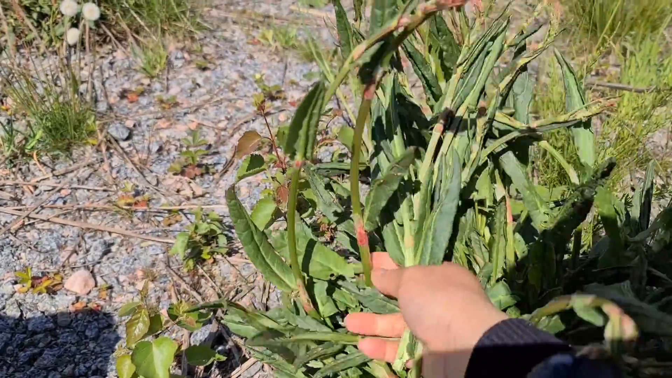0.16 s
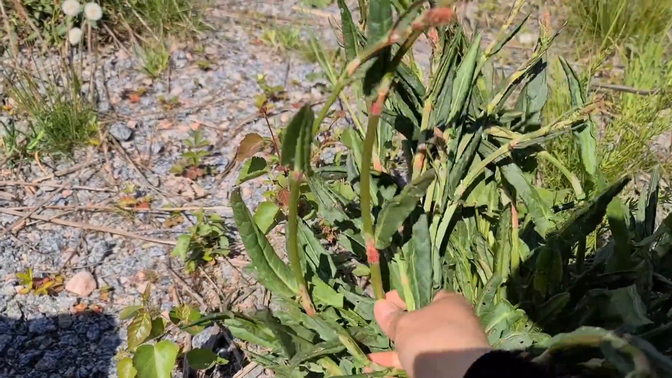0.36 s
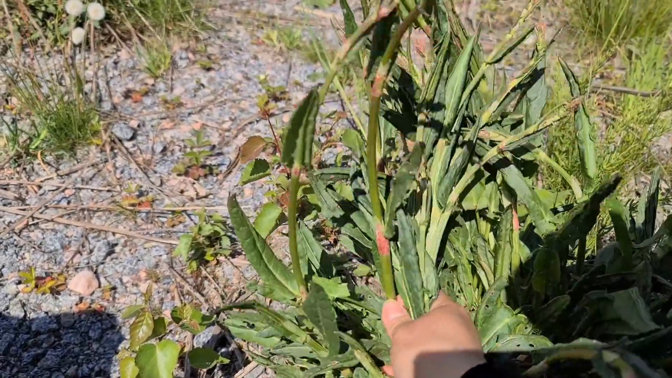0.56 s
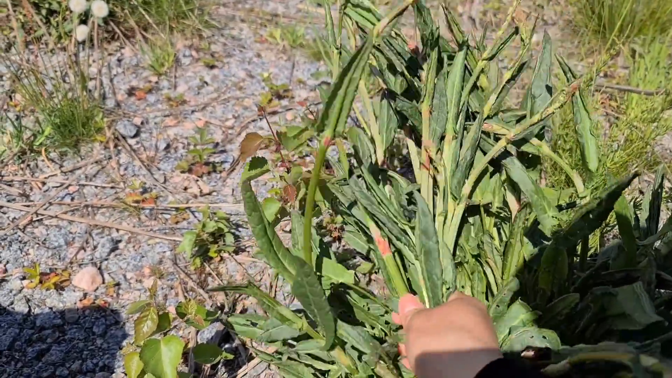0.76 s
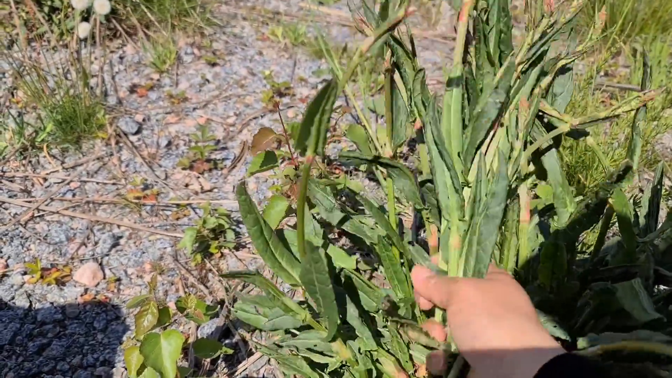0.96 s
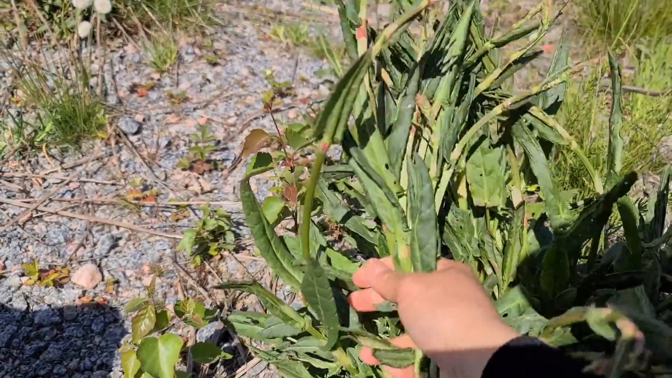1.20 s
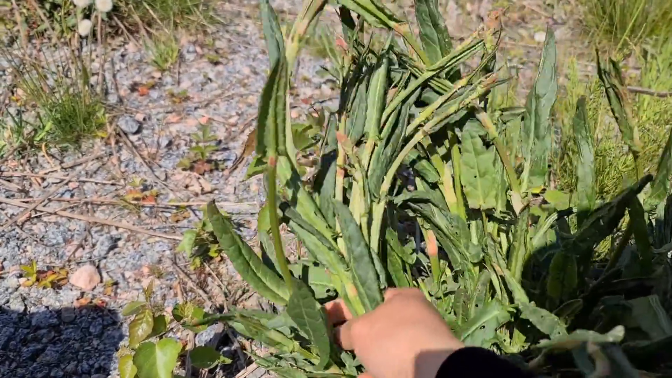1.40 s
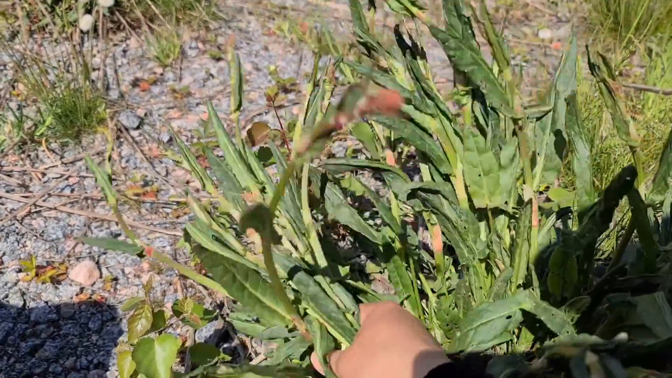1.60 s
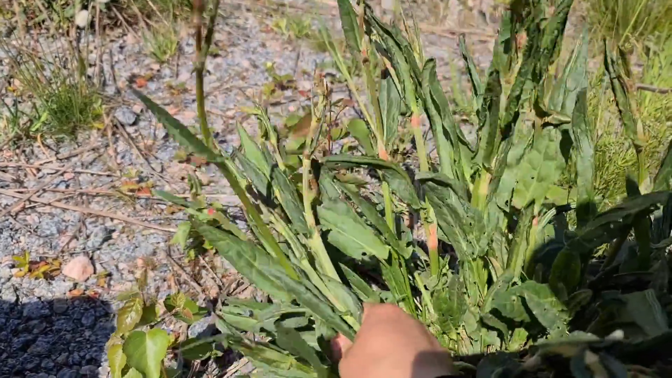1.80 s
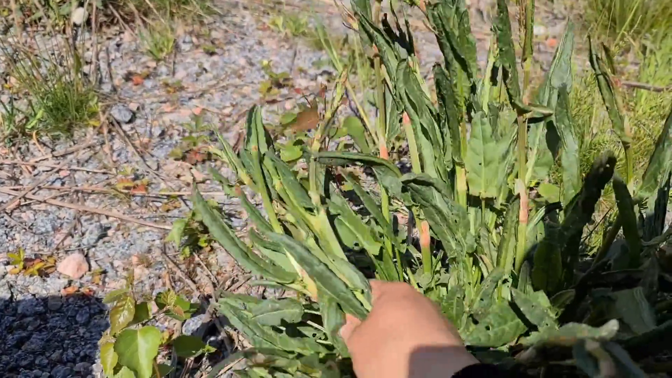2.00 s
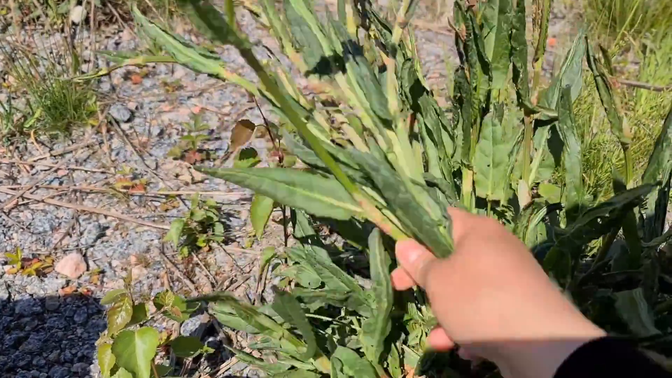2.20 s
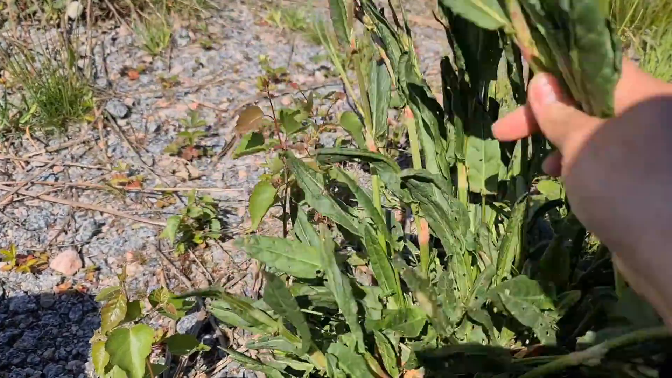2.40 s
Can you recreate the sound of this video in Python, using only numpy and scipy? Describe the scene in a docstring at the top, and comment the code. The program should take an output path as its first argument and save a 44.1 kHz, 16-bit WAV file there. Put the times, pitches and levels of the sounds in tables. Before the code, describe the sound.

Fleshy green stems snap in a hand very close to a stereo microphone: one loud hollow pop, a sharp crack, a softer pop, then a quick cluster and another crack, over low outdoor rumble.

```python
"""A hand picks a bunch of leafy stems in a garden, close to a stereo microphone.
Juicy stems give way with hollow pops, made of three decaying modes and a soil echo.
Fibres tear with sharp cracks, made of noise bursts with a jolt; leaves slide in dense streams of ticks.
Behind lie a low outdoor rumble of coloured noise and a small bird repeating a falling, swept-sine chirp."""
import sys
import numpy as np
from scipy import signal
from scipy.fft import rfft, irfft, next_fast_len
from scipy.io import wavfile
from scipy.ndimage import uniform_filter1d

SR = 44100
rng = np.random.default_rng(int(sys.argv[2]) if len(sys.argv) > 2 else 0)


def put_to_file(sound):
    """Save the sound as 16-bit audio at rate SR, in the file named by the first command-line argument."""
    columns = np.atleast_2d(sound).T  # one column per channel
    safe = np.clip(columns, -1, 1)
    whole_steps = np.round(safe * 32767)
    wavfile.write(sys.argv[1], SR, whole_steps.astype(np.int16))


N = 110250  # 2.5 s

# Outdoor rumble spectrum, relative: pitch_hz, level_db (per Hz)
RUMBLE_COLOUR = [(20, -15.5), (36, -12.5), (52, 4.5), (75, 1.5), (110, 3), (175, 2), (290, -7), (440, -4),
                 (650, -13), (1100, -20.5), (2000, -19), (2700, -29.5), (4200, -33), (6800, -49.5),
                 (9200, -42.5), (16000, -66.5)]
# Side against mid in the rumble: pitch_hz, level_db
RUMBLE_WIDTH = [(60, -18), (120, -22), (220, -7.5), (400, -7.5), (750, 4), (1300, 5), (2400, -4.5),
                (8000, 5.5)]
# Leaves sliding past each other, level over time: time_s, level_db
LEAF_SLIDE = [(0, -64.5), (.11, -62.5), (.29, -59), (0.348, -54), (.41, -74.5), (0.638, -70.5),
              (0.698, -45), (.745, -48), (.775, -49), (0.812, -63.5), (0.886, -48), (0.922, -67.5),
              (1.04, -55.5), (1.19, -70.5), (1.42, -68), (1.50, -55.5), (1.609, -48), (1.71, -65),
              (1.85, -57.5), (1.899, -53), (2.011, -65), (2.14, -50.5), (2.21, -55.5), (2.264, -47),
              (2.33, -59.5), (2.37, -51.5), (2.41, -71), (2.5, -74.5)]
# Leaf tick spectrum, relative: pitch_hz, level_db (per Hz)
LEAF_COLOUR = [(300, 9), (1200, -5), (3000, 1.5), (3900, -3.5), (4700, 0.5), (7000, -1.5), (9200, 3.5),
               (11300, 2.5), (13500, -2.5), (16000, -3.5)]
# Edges of the rustle bands that flicker separately: edge_hz
LEAF_EDGES_HZ = [0, 3500, 5500, 7500, 9500, 12000, 22050]
# Hollow stems popping: start_s, level_db, pitch_hz, ring_ms (time constant),
# body_db (low mode against main mode), low_edge_hz (high-pass), left_over_right_db
STEM_POPS = [(0.2428, 1.5, 1145, 0.91, -0.5, 153, -1), (0.2937, -27, 1850, 0.5, -21, 600, 4),
             (1.0741, -14.5, 1700, 0.64, -16, 495, 6), (1.117, -31, 1360, 0.47, -16, 600, 6),
             (1.6746, -14, 1990, .9, -30, 1070, 3.5), (1.7242, -8.5, 1800, 0.57, -27, 740, 2),
             (1.7597, -4.5, 1990, 0.69, -32, 1260, 3.5)]
# Fibres tearing: start_s, level_db, decay_ms (time constant), tilt_db (per octave above 1024 Hz),
# left_over_right_db
FIBRE_CRACKS = [(.2432, -21.5, 1.9, -13.5, -6), (0.2598, -37.5, 2.6, 4.5, -1), (0.689, -9, 2.21, 1, 2.5),
                (0.7032, -28, 1.5, 3, -4), (0.7251, -34.5, 8.7, 4, 0), (0.7409, -34, 5, 0.5, -2),
                (1.0744, -34.5, 3.4, -12.5, -5.5), (1.7598, -20.5, 0.38, -2.5, 13.5),
                (1.8666, -9.5, 2.04, -2, 6), (1.9146, -43, 3, 0, 2), (2.0533, -33.5, 6.6, 9.5, 6.5),
                (2.136, -43, 4.7, 3.5, 10), (2.2724, -37, 1.6, -3, 3), (2.3674, -48.5, 2.5, -4.5, 8)]
# Tearing fibre spectrum, relative: pitch_hz, level_db (per Hz)
CRACK_COLOUR = [(100, -49.5), (700, -8.5), (1500, -4), (2400, -1), (3600, 0), (5200, 1.5), (6700, -2),
                (8200, 5), (11000, 5.5), (13500, -7), (16000, -1)]
# Spectrum of the stem's single jolt as it parts, relative: pitch_hz, level_db (per Hz)
JOLT_COLOUR = [(40, -6), (160, 2.5), (450, -0.5), (780, -3.5), (1060, 2.5), (1400, -10.5), (2400, -1.5),
               (4000, -8.5), (16000, -32.5)]
# Bird chirps: start_s, level_db
BIRD_CHIRPS = [(1.815, -49), (1.993, -50.5), (2.185, -49), (2.375, -49)]

RUMBLE_DB, RUMBLE_WAVER_DB, RUMBLE_WAVER_PER_S = -45, 0.23, 11.55

LEAF_TICKS_PER_S, LEAF_SPREAD_DB = 5000, 1.5
CRACKLE_PER_S, CRACKLE_DB = 160, -7.5  # sparse edge crackle against the dense ticks
LEAF_WIDTH, LEAF_PAN_DB = 0.92, 1
LEAF_FLICKER_DB, LEAF_FLICKER_PER_S = 1.73, 90  # all bands together
LEAF_BAND_DB, LEAF_BAND_PER_S = 2.2, 45  # each band on its own

BODY_RATIO, BODY_RING_MS = 0.68, 0.74  # low mode of a stem against its pitch
UPPER_RATIO, UPPER_DB, UPPER_RING_MS = 1.336, -11, 0.61
POP_ATTACK_S = 0.00037
POP_TOP_HZ = 3350  # soft flesh damps the treble above
PORT_LAG_S = 0.000096  # pops reach the right microphone port first
GROUND_LAG_S, GROUND_DB = 0.00241, -16  # echo of the pops from the soil
POP_WET_DB, POP_T60_S = -13, 0.022

CRACK_ATTACK_S, CRACK_WIDTH = 0.00076, 0.99
JOLT_DB, JOLT_LAG_S = 10.5, 0.00045
CRACK_WET_DB, CRACK_T60_S = -19, 0.05

CHIRP_S, CHIRP_FROM_HZ, CHIRP_TO_HZ = 0.041, 3500, 2640
BIRD_WET_DB, BIRD_T60_S = -7, 0.12

RECORDER_TOP_HZ = 15600


def undb(db):
    """Decibels to gain."""
    return 10 ** (np.asarray(db) / 20)


def unit(x):
    """Scale to rms 1."""
    return x / np.sqrt(np.mean(x ** 2) + 1e-20)


def colour(x, points, tilt_db=0):
    """Minimum-phase filter through (Hz, dB) points, tilted per octave above 1024 Hz."""
    size = 2 * next_fast_len(len(x))
    octave = np.log2(np.maximum(np.fft.rfftfreq(size, 1 / SR), 10))
    hz, db = np.array(points, float).T
    response_db = np.interp(octave, np.log2(hz), db) + tilt_db * np.maximum(octave - 10, 0)
    # fold the cepstrum onto positive time, so nothing sounds ahead of its cause
    cepstrum = irfft(np.log(undb(response_db)))
    cepstrum[1:size // 2] *= 2
    cepstrum[size // 2 + 1:] = 0
    return irfft(rfft(x, size) * np.exp(rfft(cepstrum)))[:len(x)]


def walk(rate):
    """Smooth random wandering, spread near 1, with about rate new values per second."""
    hold = max(int(SR / rate), 1)
    steps = np.repeat(rng.standard_normal(N // hold + 1), hold)
    return unit(uniform_filter1d(steps, hold)[:N])


def pan_gain(pan_db):
    """Left and right gains whose ratio is pan_db."""
    return undb(np.array([[pan_db], [-pan_db]]) / 2)


def stereo(mid, side, pan_db=0):
    """Left and right from mid and side."""
    return np.array([mid + side, mid - side]) * pan_gain(pan_db)


def add(out, start_s, sound):
    """Mix a sound in at its time."""
    i = max(int(start_s * SR), 0)
    out[:, i:i + sound.shape[1]] += sound[:, :max(N - i, 0)]


def garden(x, wet_db, t60):
    """Ground and plants scatter a short tail: noise that decays by 60 dB in t60 seconds."""
    t = np.arange(SR // 4) / SR
    tail = rng.standard_normal((2, len(t))) * np.exp(-np.log(1000) * t / t60)
    tail = unit(tail) / np.sqrt(len(t))
    return x + undb(wet_db) * signal.fftconvolve(x, tail, axes=1)[:, :N]


def rumble():
    """Distant outdoor rumble: coloured noise, nearly the same in both ears in the bass and wide above."""
    mid, side = (unit(colour(rng.standard_normal(N), RUMBLE_COLOUR)) for _ in range(2))
    level_db = RUMBLE_DB + RUMBLE_WAVER_DB * walk(RUMBLE_WAVER_PER_S)
    return stereo(mid, colour(side, RUMBLE_WIDTH)) * undb(level_db)


def leaf_ticks(rate):
    """Leaf surfaces catch and slip: ticks at random times, of random sign and strength."""
    sign = (rng.random(N) < rate / SR) * rng.choice([-1, 1], N)
    strength = undb(LEAF_SPREAD_DB * np.minimum(rng.exponential(size=N), 4))
    return unit(colour(sign * strength, LEAF_COLOUR))


def leaves():
    """Dense ticks and sparse edge crackle, as strong as the hand drags the leaves."""
    mid, side = (leaf_ticks(LEAF_TICKS_PER_S) + undb(CRACKLE_DB) * leaf_ticks(CRACKLE_PER_S)
                 for _ in range(2))
    spectrum = rfft(stereo(mid, LEAF_WIDTH * side, LEAF_PAN_DB))
    hz = np.fft.rfftfreq(N, 1 / SR)
    rustle = np.zeros((2, N))
    for low_hz, high_hz in zip(LEAF_EDGES_HZ, LEAF_EDGES_HZ[1:]):
        band = irfft(spectrum * ((hz >= low_hz) & (hz < high_hz)), N)
        rustle += band * undb(LEAF_BAND_DB * walk(LEAF_BAND_PER_S))
    slide_db = np.interp(np.arange(N) / SR, *np.array(LEAF_SLIDE).T)
    return rustle * undb(slide_db + LEAF_FLICKER_DB * walk(LEAF_FLICKER_PER_S))


def stem_mode(seconds, hz, ring_ms):
    """One resonance of a hollow stem: a decaying sine."""
    return np.sin(2 * np.pi * hz * seconds) * np.exp(-seconds * 1000 / ring_ms)


def pops():
    """A stem gives way at once, its hollow rings for a few cycles, and the soil mirrors it."""
    out, t = np.zeros((2, N)), np.arange(SR // 20) / SR
    ports = np.maximum(np.array([t - PORT_LAG_S, t]), 0)  # time since arrival at left, right
    attack = np.minimum(ports / POP_ATTACK_S, 1)
    flesh = signal.butter(6, POP_TOP_HZ, fs=SR, output="sos")
    for start_s, level_db, pitch_hz, ring_ms, body_db, low_edge_hz, pan_db in STEM_POPS:
        ring = stem_mode(ports, pitch_hz, ring_ms)
        ring += undb(body_db) * stem_mode(ports, pitch_hz * BODY_RATIO, BODY_RING_MS)
        ring += undb(UPPER_DB) * stem_mode(ports, pitch_hz * UPPER_RATIO, UPPER_RING_MS)
        low_cut = signal.butter(4, low_edge_hz, "high", fs=SR, output="sos")
        pop = signal.sosfilt(np.vstack([low_cut, flesh]), ring * attack)
        pop *= undb(level_db) * pan_gain(pan_db)
        add(out, start_s, pop)
        add(out, start_s + GROUND_LAG_S, undb(GROUND_DB) * pop)
    return out


def cracks():
    """The stem parts with one jolt while many fibres break in a brief, decaying burst."""
    out, t = np.zeros((2, N)), np.arange(SR // 20) / SR
    impulse = 1. * (t == 0)
    jolt = undb(JOLT_DB) * unit(colour(impulse, JOLT_COLOUR)) / np.sqrt(len(t))
    for start_s, level_db, decay_ms, tilt_db, pan_db in FIBRE_CRACKS:
        shape = np.minimum(t / CRACK_ATTACK_S, 1) * np.exp(-t * 1000 / decay_ms)
        fibres = rng.choice([-1, 1], (2, len(t)))
        mid, side = (unit(colour(f * shape, CRACK_COLOUR, tilt_db)) for f in fibres)
        # a longer tear carries more energy
        burst_gain = undb(level_db) * np.sqrt(np.mean(shape ** 2))
        add(out, start_s, stereo(mid, CRACK_WIDTH * side, pan_db) * burst_gain)
        # a tear that dies within its attack jolts less
        jolt_gain = undb(level_db) * shape.max() ** 2
        add(out, start_s + JOLT_LAG_S, stereo(jolt, 0, pan_db) * jolt_gain)
    return out


def bird():
    """A distant bird: short, slightly hoarse whistles that swell and fade as they fall in pitch."""
    out, u = np.zeros((2, N)), np.linspace(0, 1, int(CHIRP_S * SR))
    for start_s, level_db in BIRD_CHIRPS:
        glide_hz = CHIRP_FROM_HZ + (CHIRP_TO_HZ - CHIRP_FROM_HZ) * u
        hz = glide_hz * (1 + 0.025 * walk(1200)[:len(u)])  # fast pitch jitter gives the hoarseness
        swell = np.sin(np.pi * u ** 1.4)
        note = np.sin(2 * np.pi * np.cumsum(hz) / SR) * swell * undb(level_db)
        add(out, start_s, stereo(note, 0, pan_db=2.0))
    return out


def scene():
    """Picking in front, bird and rumble behind."""
    background = rumble() + garden(bird(), BIRD_WET_DB, BIRD_T60_S)
    stems = garden(pops(), POP_WET_DB, POP_T60_S) + garden(cracks(), CRACK_WET_DB, CRACK_T60_S)
    return background + leaves() + stems


def record(dry):
    """The recorder clips at full scale, then a steep low-pass cuts the top."""
    top_cut = signal.ellip(10, 0.2, 80, RECORDER_TOP_HZ, fs=SR, output="sos")
    return signal.sosfilt(top_cut, np.clip(dry, -1, 1))


dry = scene()
out = record(dry)
put_to_file(out)
```